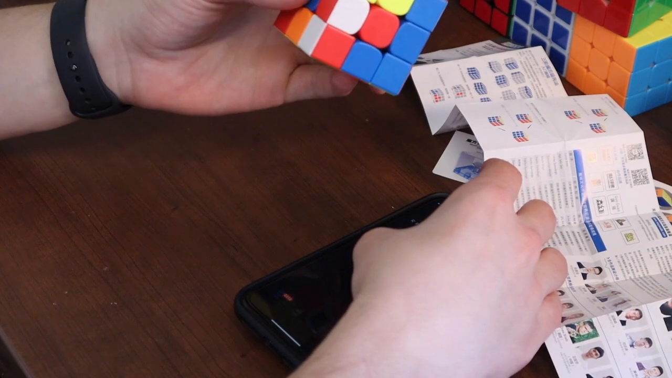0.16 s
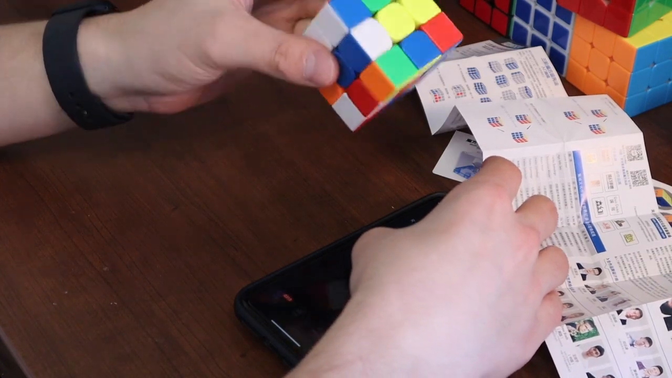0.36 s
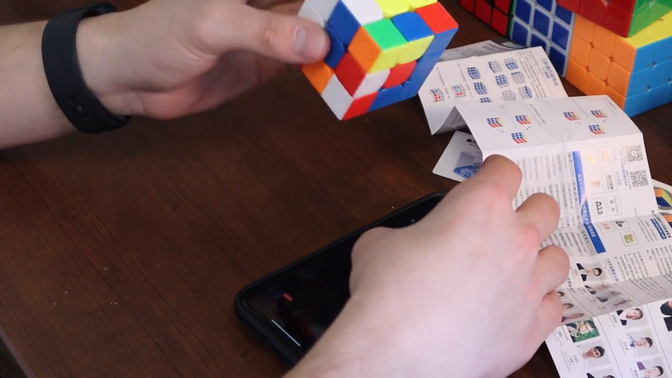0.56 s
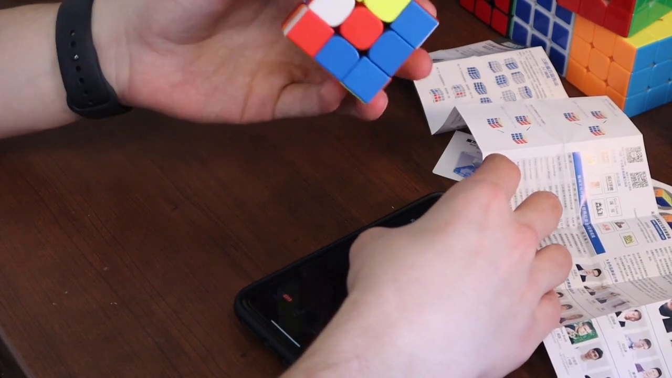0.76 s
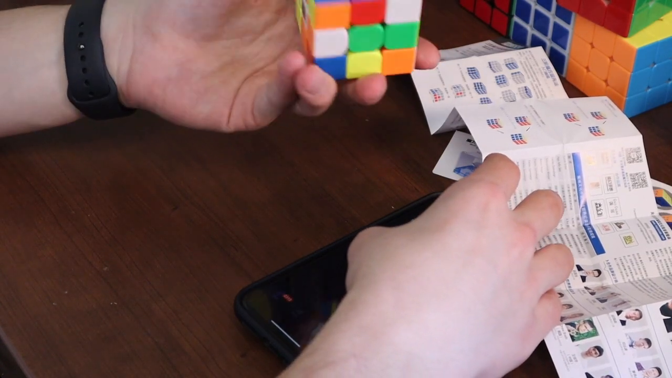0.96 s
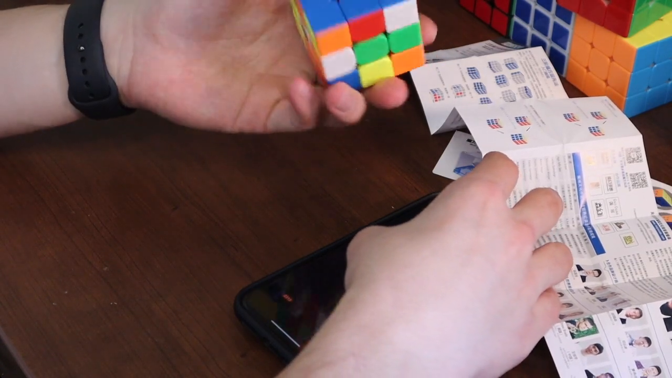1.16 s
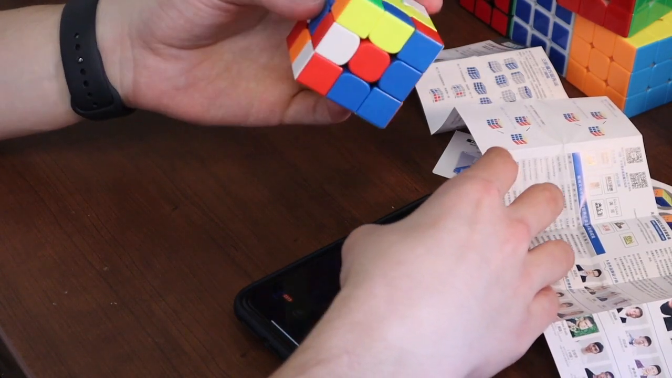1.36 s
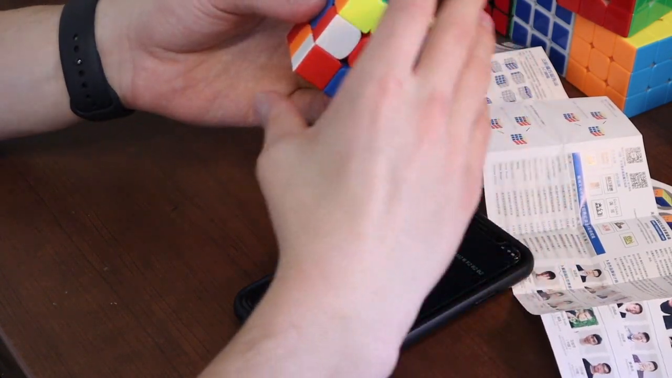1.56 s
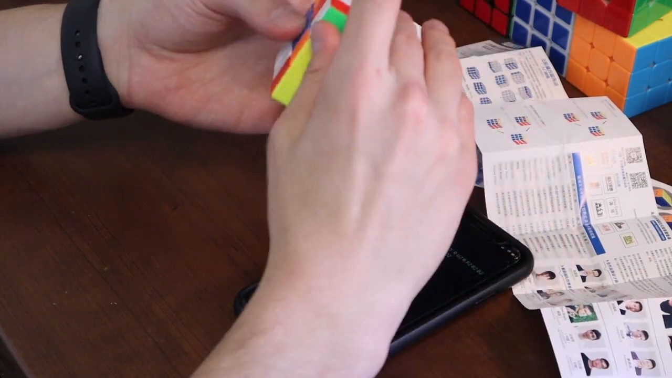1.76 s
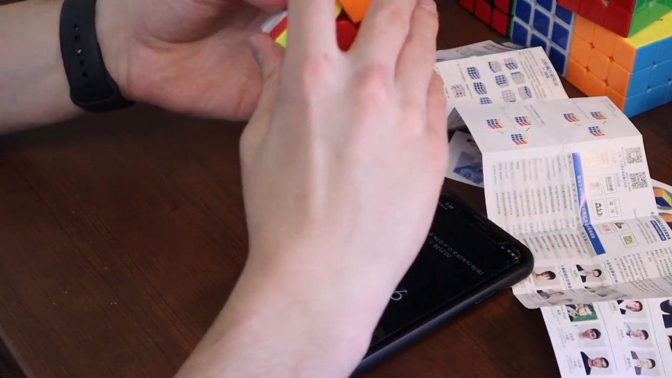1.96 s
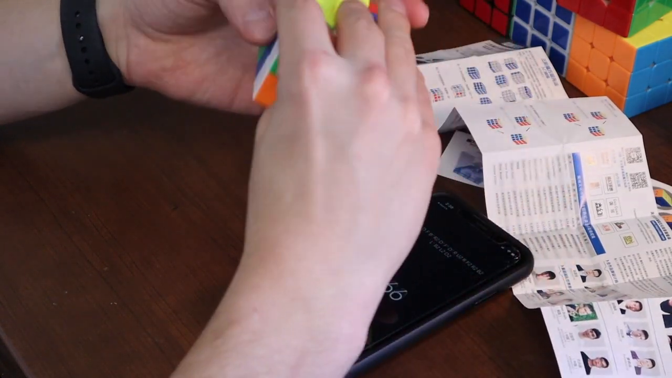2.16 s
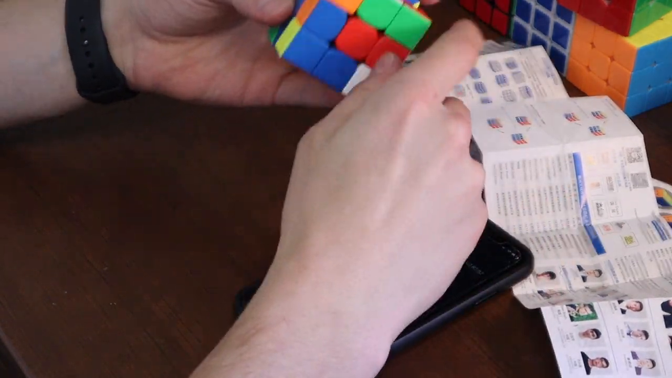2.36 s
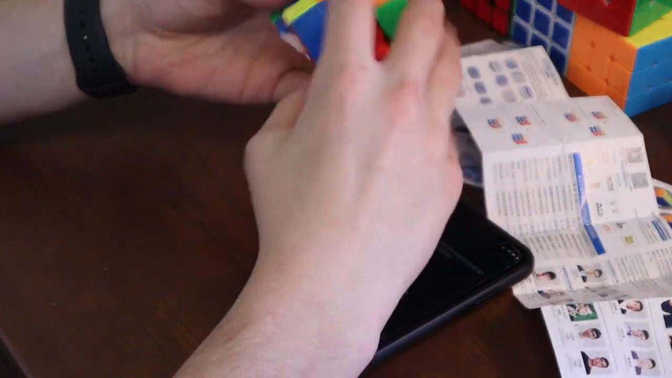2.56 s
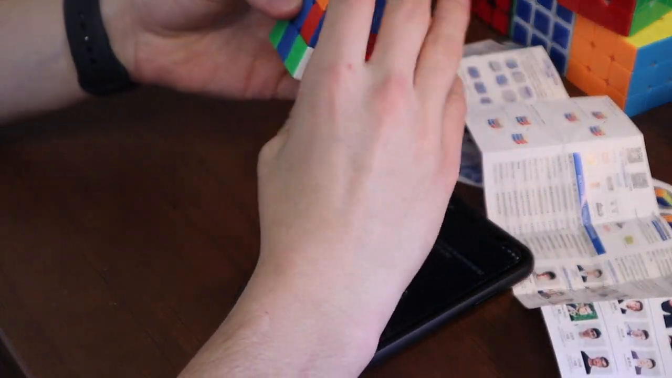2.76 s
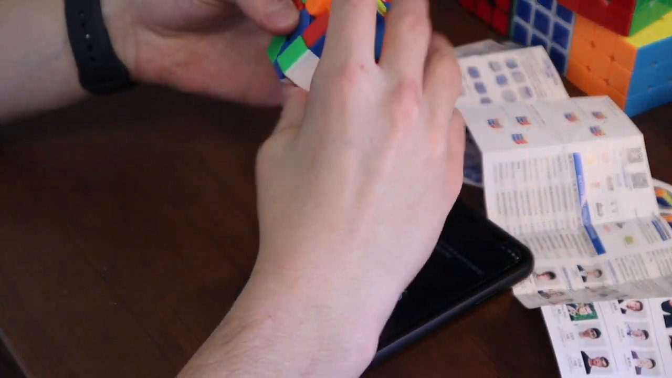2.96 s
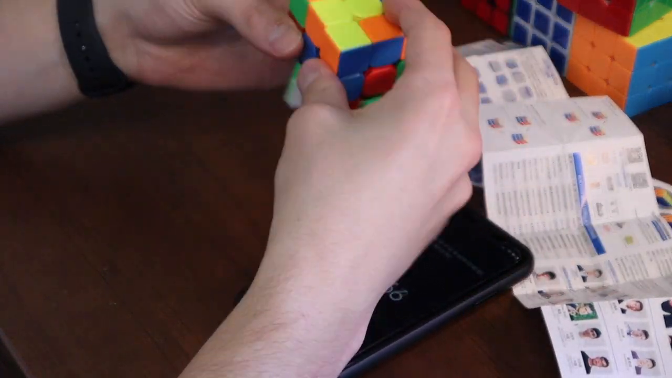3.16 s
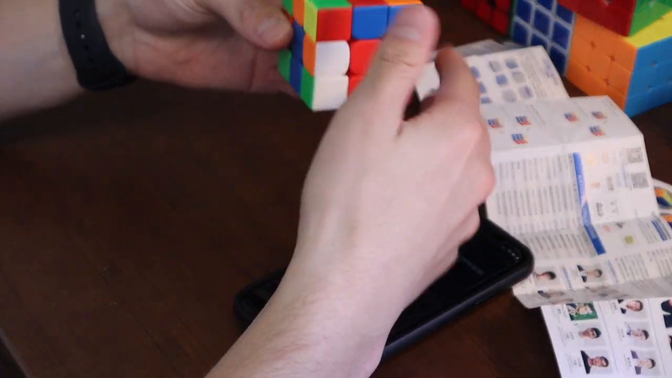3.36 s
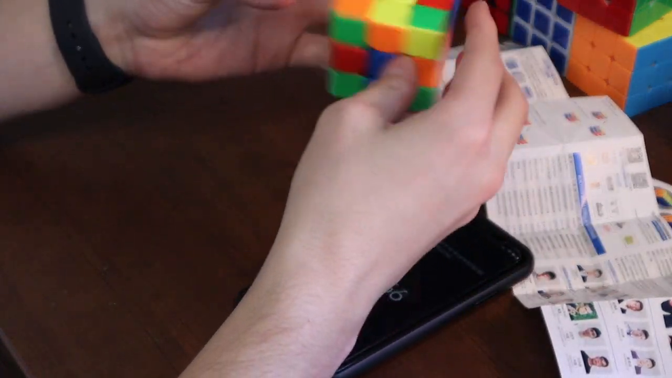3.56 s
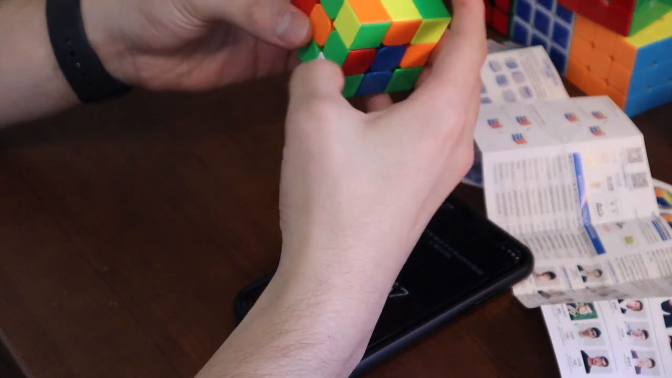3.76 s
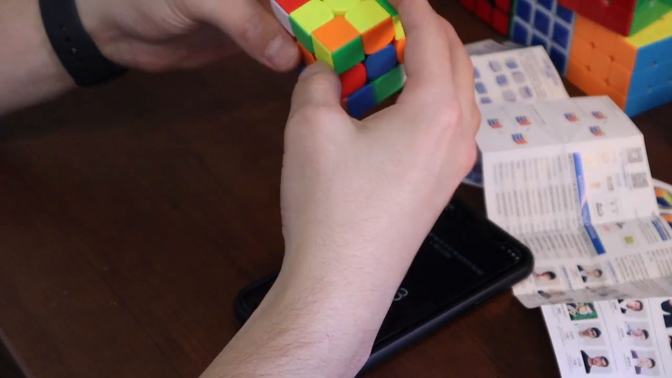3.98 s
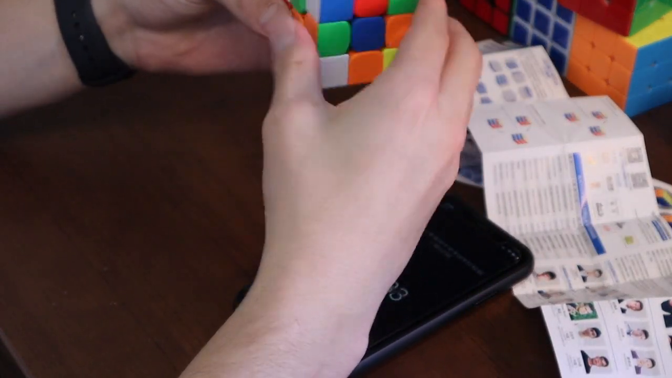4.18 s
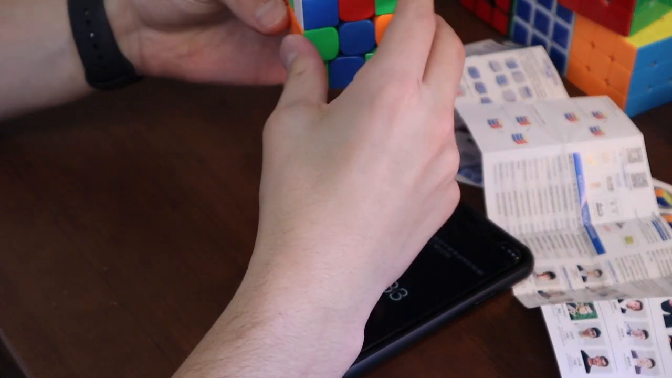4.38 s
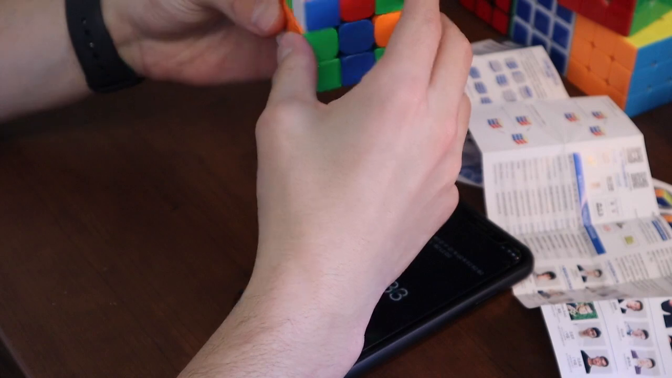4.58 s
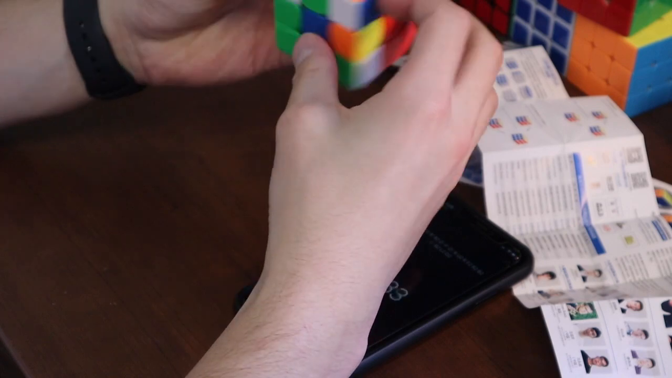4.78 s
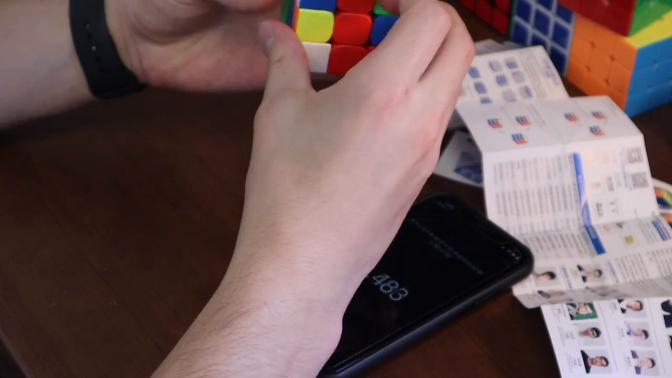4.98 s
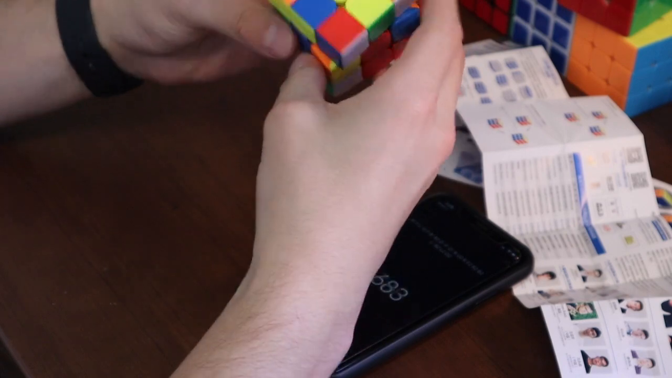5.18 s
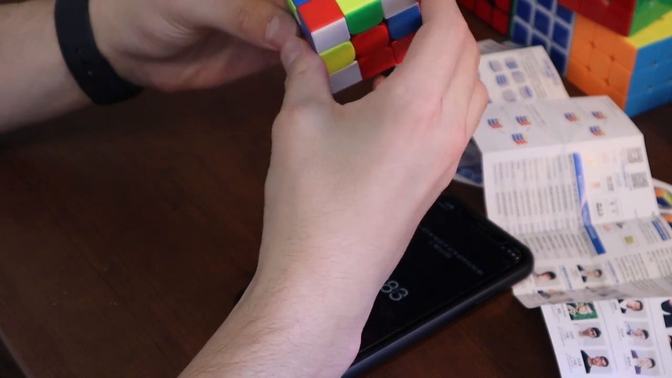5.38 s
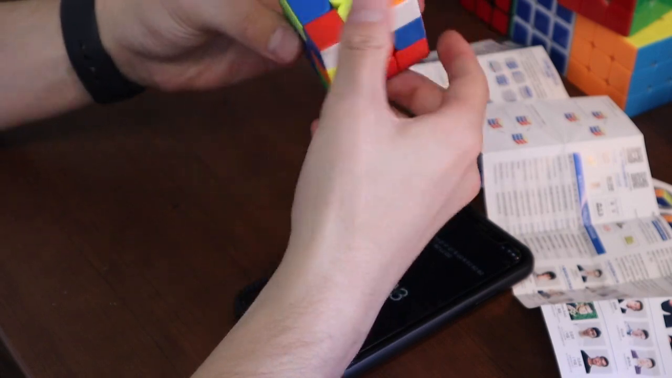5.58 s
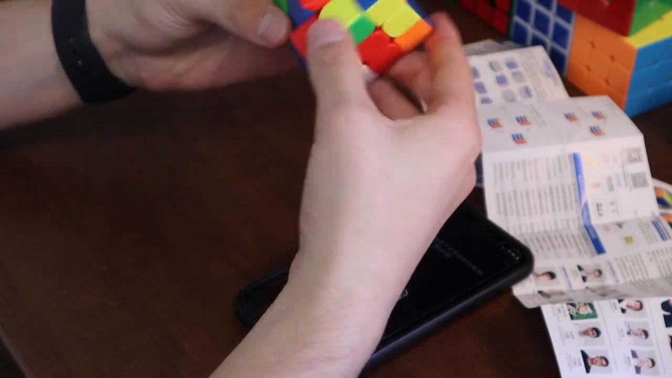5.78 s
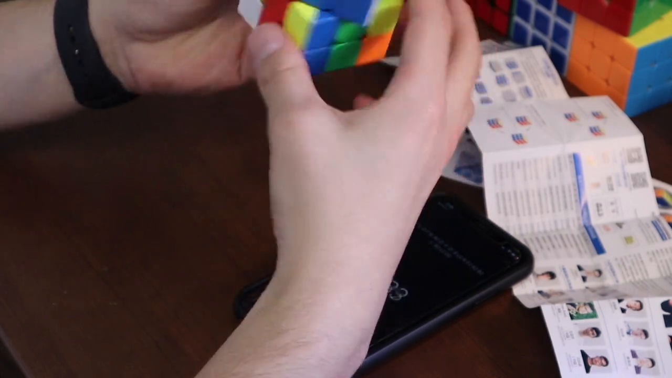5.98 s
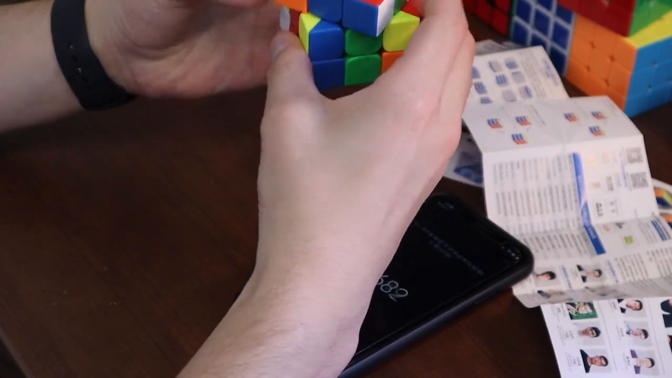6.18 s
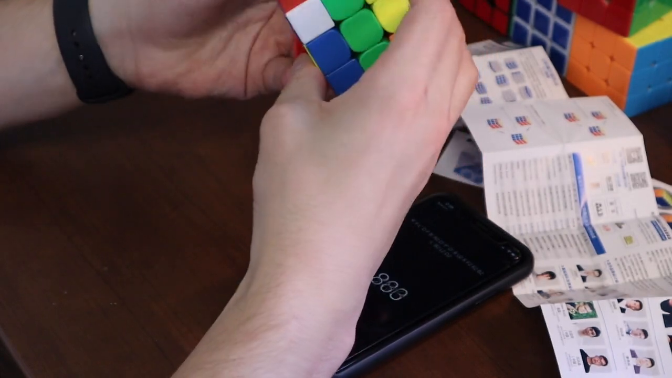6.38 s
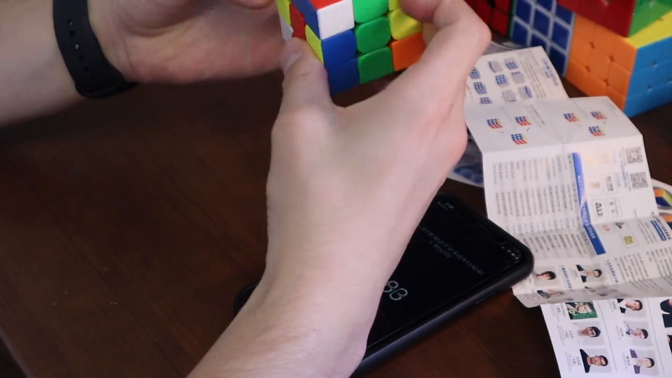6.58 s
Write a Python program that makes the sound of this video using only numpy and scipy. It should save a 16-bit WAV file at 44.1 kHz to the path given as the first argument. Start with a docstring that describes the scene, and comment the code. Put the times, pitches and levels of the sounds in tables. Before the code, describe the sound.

A plastic puzzle cube gives a few faint ticks and a thin ring from its springs. A hand bumps softly on a wooden desk, then fast turning begins: each twist is a short scrape and a volley of sharp, hollow clacks. The bursts keep coming unevenly, with brief pauses between them. It is all close to one microphone in a small room, with a low fan hum underneath.

```python
"""Speed cube over a desk

A plastic speed cube, turned fast in the hands over a wooden desk, close to one microphone in a small room.
Each turn is a short scrape of sliding pieces and a volley of clacks as they collide and seat; every clack
is a few milliseconds of rattling contacts in hollow plastic. A hand bumps the desk, the springs in the
core ring faintly, and a fan hums underneath."""
import sys
import numpy as np
from scipy import signal
from scipy.fft import rfft, irfft
from scipy.io import wavfile

SR = 44100
rng = np.random.default_rng(int(sys.argv[2]) if len(sys.argv) > 2 else 0)


def output_pcm(signal):
    """Save a mono or channel-first signal as 16-bit PCM at the path in sys.argv[1].

    Samples are clipped to [-1, 1] before scaling.
    """
    pcm = np.clip(np.atleast_2d(signal).T, -1, 1) * 32767
    wavfile.write(sys.argv[1], SR, np.round(pcm).astype(np.int16))


N = 292383
TIME = np.arange(N) / SR

# spectrum of the fan's rush of air: f/Hz, relative level/dB
FAN_RUSH = [(15, -26), (25, -5), (53, -2), (70, -2.5), (114, -2), (149, -4.5), (175, -9.5), (256, -4.5),
            (363, -7), (624, -17), (1560, -22.5), (1740, -18), (2000, -25), (9070, -30), (16000, -31)]
# hum lines of the fan: f/Hz, level/dB
FAN_HUM = [(44, -59.5), (183, -64), (258.4, -65.5), (360.7, -63.5), (1480, -71.5)]
# a faint low tone that swells briefly: t/s, level/dB
DRONE_SWELL = [(3.4, -73), (3.8, -54.5), (4.3, -56), (4.7, -67.5)]
# decay of the room: f/Hz, T60/s
ROOM_DECAY = [(200, .35), (800, .55), (2000, .38), (5000, .36), (8000, .33), (15000, .25)]
# the room's tail at the microphone: f/Hz, band level against the direct sound/dB
ROOM_BANDS = [(200, -9.5), (1000, -11), (2000, -13.5), (5000, -11), (7500, -12), (11000, -15), (16000, -24)]
# modes of the wooden desk: f/Hz, relative level/dB, T60/s
DESK_RESONANCES = [(85.3, 4, 0.11), (130, -2, 0.085), (197, -5, 0.25), (283, 2.5, 0.04), (422, 1.5, 0.089),
                   (490, 0, .04), (593, 1, 0.079), (1084, -5, 0.036), (1410, -1, .03), (2100, 13.5, 0.03)]
# soft bumps of a hand on the desk: t/s, level/dB, corner f/Hz (lower is softer)
HAND_BUMPS = [(1.491, -36, 1550), (3.681, -39.5, 70)]
# springs in the core: t/s, f/Hz, width/Hz, level/dB, T60/s
SPRING_RINGS = [(.49, 1670, 13, -66, 1.2), (0.591, 1690, 15.7, -58.5, 2.3), (2.984, 6380, 730, -38, 0.2)]
# spectrum of sliding plastic: f/Hz, relative level/dB
SCRAPE_SPECTRUM = [(150, -22.5), (500, -16), (1000, 1), (1800, -2.5), (2800, 1), (5000, -0.5), (8000, 1.5),
                   (11000, -7), (16000, -19.5)]
# broad spectrum of a plastic contact: f/Hz, relative level/dB
CONTACT_SPECTRUM = [(100, -21.5), (250, -15.5), (500, -8.5), (900, -7), (1700, -2), (2600, -1), (4500, 1),
                    (6000, 2), (7800, 3), (10000, -1.5), (13000, -6.5), (16000, -16)]
# resonances of the hollow pieces: f/Hz, width/Hz, strength/dB
SHELL_MODES = [(920, 110, 5), (1200, 260, -8.5), (1620, 240, 3.5), (1840, 240, 5.5), (2780, 270, 1.5),
               (3590, 110, 6), (4570, 290, 0), (4500, 280, -1), (5060, 91, 7.5), (7090, 250, 3.5),
               (8390, 660, 2)]
# turns of a layer; the grip and the pieces that meet colour every clack of the turn: start/s, end/s,
# scrape level/dB, core boom/dB, hollow body/dB, hard edge/dB, struck piece's ring f/Hz, ring strength/dB
LAYER_TURNS = [(1.725, 1.781, -32.5, 0, -1, -2.5, 1020, 9), (1.84, 1.911, -28, -10, 8, 1.5, 4730, 4.5),
               (2.117, 2.218, -28, 11, 1.5, -0.5, 8450, 4.5), (2.292, 2.383, -34.5, 14, 3, 3, 7050, -1.5),
               (2.589, 2.66, -30.5, -10, 2, 1.5, 2773, -4), (2.816, 2.937, -51.5, 4.5, 5, 6.5, 2600, 13),
               (2.976, 3.024, -40, 0, -1.5, 0.5, 6490, 13.5), (3.106, 3.201, -48, -3, -1, -2.5, 4830, -1),
               (3.194, 3.294, -31.5, 4, 5.5, 1.5, 4240, 1.5), (3.302, 3.41, -33, -6, 4, 2.5, 6930, 0.5),
               (3.553, 3.746, -51, 8, 3.5, -2, 1369, 1), (3.972, 4.101, -30.5, 0, 5.5, 0.5, 1720, 0),
               (4.299, 4.364, -29.5, 13.5, -2, -5, 2010, 5), (4.634, 4.702, -35.5, 3.5, 3, 2, 3800, 3),
               (4.78, 4.993, -58.5, 13.5, 0, -1.5, 1498, -0.5),
               (5.087, 5.169, -30, 8.5, 2.5, 0.5, 4800, 3.5), (5.65, 5.711, -30, 2.5, -1, 1, 1707, 5.5),
               (5.714, 5.739, -18, 9, -7.5, -2.5, 9550, 1.5), (5.757, 5.84, -29, -6, -5.5, -1, 1530, 7),
               (5.9, 5.979, -31, 14, -3, -2.5, 1150, 6), (6.291, 6.328, -22, 13, -3.5, 0.5, 1740, 4),
               (6.336, 6.515, -42.5, 16, -1.5, -4.5, 1547, 0),
               (6.494, 6.586, -31, 19, -4.5, -0.5, 1740, 2.5)]
# pieces colliding and seating: t/s, level/dB, rattle length/ms
SEATING_CLACKS = [(.3527, -47, 2.1), (.9577, -47, 4.3), (1.293, -47, 0.96), (1.7386, -25, 2.1),
                  (1.7471, -24.5, 2), (1.7616, -14.5, 1.1), (1.7855, -31.5, 1.6), (1.8469, -20.5, 7.6),
                  (1.864, -12, 6.3), (1.8896, -17, 2.3), (1.9277, -31, 2.8), (1.9592, -32, 1.1),
                  (2.1283, -22.5, 4), (2.1522, -7, 2), (2.1672, -24, 2.05), (2.1772, -13, 5),
                  (2.3044, -29.5, 3.4), (2.3185, -22, 1.8), (2.3343, -15.5, 3.8), (2.3577, -28, 2),
                  (2.3718, -27.5, 2.6), (2.3976, -34, 2.8), (2.5204, -42.5, 3.6), (2.592, -26, 1.7),
                  (2.6044, -27, 3.4), (2.611, -14.5, 4), (2.6312, -27, 1.9), (2.6472, -25.5, 2.6),
                  (2.8232, -41, 2.3), (2.846, -43.5, 2.9), (2.9087, -28, 2.5), (2.982, -19, 1.6),
                  (3.1152, -35.5, 1.8), (3.1283, -32.5, 2.2), (3.1876, -30.5, 4.3), (3.2058, -19.5, 3.4),
                  (3.221, -7.5, 3.4), (3.2274, -10, 5), (3.2431, -6, 5), (3.2515, -8.5, 1.6),
                  (3.2634, -10.5, 4.8), (3.2692, -9, 3), (3.2841, -12, 1.3), (3.3198, -17.5, 3.3),
                  (3.3547, -3.5, 6.1), (3.3789, -17.5, 0.83), (3.557, -36, 5.1), (3.623, -37.5, 0.7),
                  (3.6735, -26.5, 5.2), (3.7487, -42, 1.4), (3.8707, -44, 1.8), (3.962, -35, 3.6),
                  (3.9881, -25, 1.5), (4.001, -12, 4.4), (4.0185, -6, 2.4), (4.0556, -11, 5.7),
                  (4.073, -7, 2.1), (4.247, -37, 2.3), (4.2866, -33.5, 1.7), (4.305, -21.5, 2.6),
                  (4.321, -12.5, 1.8), (4.3486, -20, 4.2), (4.6485, -22, 7.4), (4.6614, -24.5, 4.5),
                  (4.6718, -25, 2.8), (4.707, -31, 1), (4.7845, -40, 3.3), (4.8396, -36.5, 4.2),
                  (5.1082, -23, 1.95), (5.1212, -11.5, 3.9), (5.3657, -44.5, 2.5), (5.6582, -24.5, 1.03),
                  (5.6661, -21, 1.4), (5.6754, -21.5, 3.2), (5.6928, -14, 2.2), (5.7068, -15.5, 1.9),
                  (5.7119, -13, 3.8), (5.7229, -7, 0.87), (5.727, -2.5, 3.1), (5.7488, -19, 2.3),
                  (5.781, -22, 2), (5.7961, -11, 3.1), (5.8184, -23, 1.3), (5.8876, -32.5, 2.4),
                  (5.9117, -23, 2), (5.93, -14, 3.9), (5.958, -9.5, 3.7), (5.9701, -20.5, 8),
                  (6.038, -26, 3.5), (6.1979, -39, 2.9), (6.2326, -33.5, 1.1), (6.2638, -30.5, 2.2),
                  (6.276, -25, 5.7), (6.2995, -8.5, 11.6), (6.3133, -3, 2.25), (6.3882, -26, 7.4),
                  (6.5054, -11.5, 2.7), (6.5105, -5, 4.1), (6.5614, -15.5, 1.5), (6.5904, -28, 1.6)]


def undb(db):
    """Decibels to gain."""
    return 10 ** (np.asarray(db) / 20)


def unit(x):
    """Scale to rms 1."""
    return x / np.sqrt(np.mean(x ** 2) + 1e-20)


def add(out, s, x):
    """Mix x into out from time s on."""
    i = min(max(int(s * SR), 0), N)
    out[i:i + len(x)] += x[:N - i]


def curve(points, hz):
    """Join (f/Hz, value) points on a log-frequency axis."""
    f, value = np.transpose(points)
    return np.interp(np.log(hz + 1), np.log(f), value)


def bins(x):
    """Frequencies of the spectrum of x."""
    return np.fft.rfftfreq(len(x), 1 / SR)


def resonance(hz, centre, width, db):
    """Power spectrum of one resonance."""
    return undb(db) ** 2 / (1 + (2 * (hz - centre) / width) ** 2)


def causal(db):
    """Frequency response with these gains that starts at the blow and only rings afterwards."""
    cepstrum = irfft(np.log(undb(db)))
    half = len(cepstrum) // 2
    cepstrum[1:half] *= 2
    cepstrum[half + 1:] = 0
    return np.exp(rfft(cepstrum))


def wavering(hz, waver, count=40):
    """A tone that wanders in level and phase."""
    knots = np.linspace(0, TIME[-1], count)
    drift = np.interp(TIME, knots, rng.standard_normal(count) + 1j * rng.standard_normal(count))
    return unit(np.real((1 + waver * drift) * np.exp(2j * np.pi * hz * TIME)))


def fan(rush_db=-50, drone_hz=149):
    """The room tone: a low rush of air with faint hiss, hum lines and a tone that swells briefly."""
    air = irfft(rfft(rng.standard_normal(N)) * undb(curve(FAN_RUSH, bins(TIME))), N)
    hum = sum(undb(db) * wavering(hz, waver=0.33) for hz, db in FAN_HUM)
    drone = undb(np.interp(TIME, *np.transpose(DRONE_SWELL))) * wavering(drone_hz, waver=.15)
    return undb(rush_db) * unit(air) + hum + drone


def echoes(first_s=0.0081, build_s=0.0039, ring_hz=1123, ring_width_hz=130, ring_t60=0.52, ring_db=-29.5):
    """Diffuse response of a small furnished room: the treble dies first, one resonance rings hollow."""
    t = TIME[:SR * 2 // 3]
    hz, noise = bins(t), rfft(rng.standard_normal(len(t)))
    centres = np.geomspace(125, 16000, 8)
    onset = 1 - np.exp(-np.maximum(t - first_s, 0) / build_s)
    tail = 0
    for centre, share in zip(centres, np.eye(len(centres))):
        band = irfft(noise * curve(np.c_[centres, share], hz), len(t))
        fade = onset * undb(-60 * t / curve(ROOM_DECAY, centre))
        tail = tail + band * fade / np.linalg.norm(fade) * undb(curve(ROOM_BANDS, centre))
    ring = irfft(noise * resonance(hz, ring_hz, ring_width_hz, 0), len(t)) * undb(-60 * t / ring_t60)
    return tail + undb(ring_db) * ring / np.linalg.norm(ring)


def room(x, stretches=12):
    """The hands keep moving the cube, so each stretch of time meets another pattern of echoes."""
    out = np.zeros(N)
    for part in np.array_split(np.arange(N), stretches):
        add(out, TIME[part[0]], signal.fftconvolve(x[part], echoes()))
    return out


def desk_bumps(skin_db=-4, skin_s=0.0096, tick_db=-9, tick_s=0.0053):
    """A hand drives the desk's modes, with a pat of skin and a tick; a softer push leaves only the lows."""
    out, t = np.zeros(N), TIME[:SR // 3]
    for s, db, corner_hz in HAND_BUMPS:
        wood = 0
        for f, mode_db, t60 in DESK_RESONANCES:
            fade = undb(mode_db - 60 * t / t60) / (1 + (f / corner_hz) ** 2)
            wood = wood + rng.choice([-1, 1]) * fade * np.sin(2 * np.pi * f * t)
        wood *= 1 - np.exp(-t / .002)
        noise = rfft(rng.standard_normal(len(t)))
        softness = 1 + bins(t) / corner_hz
        skin = undb(skin_db) * unit(irfft(noise / softness ** 2, len(t))) * np.exp(-t / skin_s)
        tick = undb(tick_db) * unit(irfft(noise / softness, len(t))) * np.exp(-t / tick_s)
        add(out, s, undb(db) * (wood / wood[:SR // 40].std() + skin + tick))
    return out


def springs(rise_s=0.0062):
    """A plucked spring in the core rings in a cluster of close tones."""
    out, t = np.zeros(N), TIME[:SR]
    for s, hz, width, db, t60 in SPRING_RINGS:
        tones = hz + width * (rng.random((16, 1)) - .5)
        ring = np.sin(2 * np.pi * (tones * t + rng.random(tones.shape))).sum(0)
        add(out, s, undb(db - 60 * t / t60) * unit(ring) * (1 - np.exp(-t / rise_s)))
    return out


def contacts(n, per_second, spread_db):
    """Tiny impacts at random moments, of unequal force."""
    hits = (rng.random(n) < per_second / SR) * rng.choice([-1, 1], n)
    return hits * undb(spread_db * rng.standard_normal(n))


def turn_speed(share):
    """Speed of a layer, 0-1, at this share of its turn: it speeds up, then slows down."""
    return np.abs(np.sin(np.pi * np.clip(share, 0, 1))) ** 0.65


def scrapes(size=16384, core_hz=1750, core_width_hz=550):
    """Pieces catch and slip on each other while a layer turns, and the hollow core answers."""
    out, t = np.zeros(N), TIME[:size]
    hz = bins(t)
    for start, end, db, core_db, *_ in LAYER_TURNS:
        # a gentle nudge slips in a light rustle, a hard flick in a dense scrape
        rate = 700 + 6300 * undb(min(db + 24, 0))
        slips = rfft(contacts(size, per_second=rate, spread_db=5))
        core = 10 * np.log10(3.5 + resonance(hz, core_hz, core_width_hz, core_db))
        scrape = unit(irfft(slips * causal(curve(SCRAPE_SPECTRUM, hz) + core)))
        add(out, start, undb(db) * turn_speed(t / (end - start)) * scrape)
    return out


def moments(start, end, per_second, count=64):
    """Unevenly spaced ticks: rows of t/s, level offset/dB."""
    times = start + np.cumsum(rng.uniform(.3, 1.7, count)) / per_second
    offsets_db = rng.uniform(-1.7, 1.7, count)
    return [(s, db) for s, db in zip(times, offsets_db) if s < end]


def loose_ticks(per_second=40, over_scrape_db=-0.5, rattle_ms=1.9):
    """Loose pieces tick during a turn, louder with its speed: rows of t/s, level/dB, rattle length/ms."""
    rows = []
    for start, end, scrape_db, *_ in LAYER_TURNS:
        for s, offset_db in moments(start, end, per_second):
            speed_db = 20 * np.log10(turn_speed((s - start) / (end - start)))
            rows.append((s, scrape_db + over_scrape_db + speed_db + offset_db, rattle_ms))
    return rows


def fidgets(start_s=2.5, per_second=6.6, db=-47, rattle_ms=1.9):
    """The fingers shift the cube and it ticks faintly: rows of t/s, level/dB, rattle length/ms."""
    return [(s, db + offset_db, rattle_ms) for s, offset_db in moments(start_s, N / SR, per_second)]


def grip(s):
    """Colour of the turn nearest to time s: body/dB, edge/dB, ring f/Hz, ring strength/dB."""
    return min(LAYER_TURNS, key=lambda turn: max(turn[0] - s, s - turn[1]))[4:]


def shells(hz, detune=0.04, scatter_db=2.0):
    """Resonances of the hollow pieces in dB; each clack finds them a little different."""
    f, width, db = np.transpose(SHELL_MODES)[:, :, None]
    f = f * (1 + detune * rng.standard_normal(f.shape))
    db = db + scatter_db * rng.standard_normal(db.shape)
    return 10 * np.log10(0.5 + resonance(hz, f, width, db).sum(0))


def rattle(t, ms, chatter_db=-15, chatter_s=0.023):
    """A collision is a burst of contacts, then a weaker chatter of the neighbouring pieces."""
    age = t * 1000 / ms
    burst = (2 * np.e * age * np.exp(-2 * age)) ** 0.92
    chatter = undb(chatter_db) * np.exp(-t / chatter_s)
    return (burst + chatter) * contacts(len(t), per_second=18000, spread_db=2)


def clacks(collisions, size=2048, gauge_s=0.0034, firm_db=-16, body_db_per_db=0.27):
    """Collisions ring the shells. Returns the sound straight to the microphone and that into the room."""
    direct, around, t = np.zeros(N), np.zeros(N), TIME[:size]
    hz = bins(t)
    body = 1 / (1 + (hz / 2500) ** 4)
    edge = curve([(4800, 0), (6800, 1), (9500, 1), (16000, .3)], hz)
    knock = curve([(300, .3), (600, 1), (1150, 1), (1500, 0)], hz)
    for s, db, ms in collisions:
        body_db, edge_db, ring_hz, ring_db = grip(s)
        # a gentler collision is a longer push, so more of it goes into the hollow body and the low knock
        body_db += body_db_per_db * (firm_db - db)
        knock_db = np.interp(db, [-18, -8], [1, -3])
        broad = curve(CONTACT_SPECTRUM, hz) + body_db * body + edge_db * edge + knock_db * knock
        force = rfft(rattle(t, ms))
        modes = shells(hz)
        ring = 10 * np.log10(0.5 + resonance(hz, ring_hz, width=400, db=ring_db))
        gain = undb(db) * np.sqrt(gauge_s * SR / size)  # level is the clack's energy spread over gauge_s
        add(direct, s, gain * unit(irfft(force * causal(broad + modes + ring))))
        # summed over all directions, the peaks and notches of a clack even out
        add(around, s, gain * unit(irfft(causal(broad + 0.36 * modes + 0.64 * ring))))
    return direct, around


def scene():
    """Cube and desk close to the microphone, the small room and the fan behind them, in mono."""
    direct, around = clacks(list(SEATING_CLACKS) + loose_ticks() + fidgets())
    handling = scrapes() + desk_bumps()
    return (direct + handling + room(around + handling) + springs() + fan())[None]


def record(dry, low_cut_hz=36, top_hz=15800):
    """The microphone drops the deepest rumble, the hardest clacks hit full scale, the top is cut."""
    low_cut = signal.butter(6, low_cut_hz, "highpass", fs=SR, output="sos")
    top_cut = signal.ellip(10, .2, 70, top_hz, fs=SR, output="sos")
    clipped = np.clip(signal.sosfilt(low_cut, dry), -1, 1)
    return signal.sosfilt(top_cut, clipped)


dry = scene()
out = record(dry)
output_pcm(out)
```